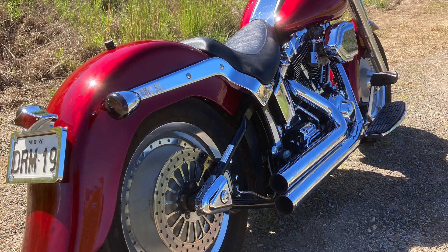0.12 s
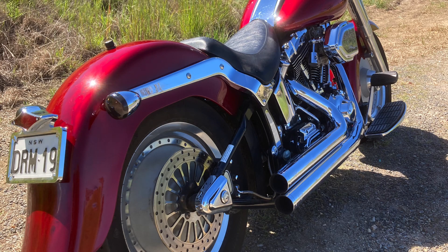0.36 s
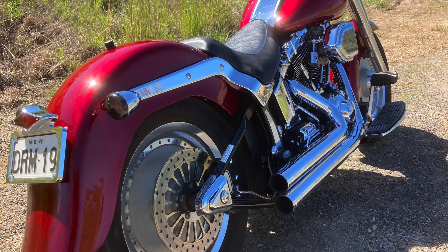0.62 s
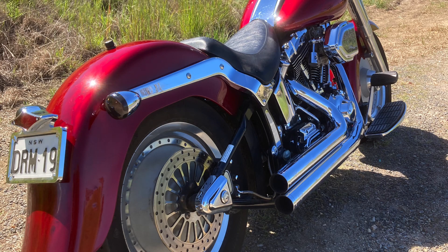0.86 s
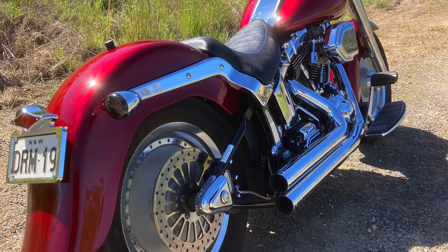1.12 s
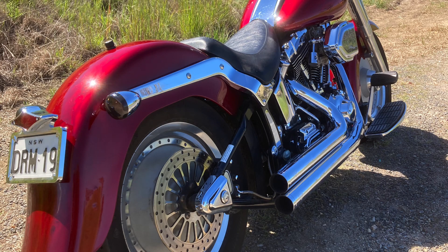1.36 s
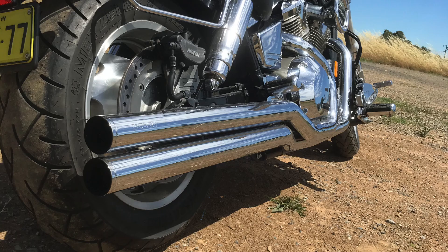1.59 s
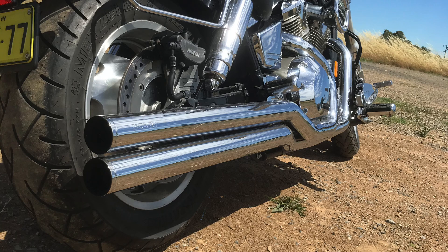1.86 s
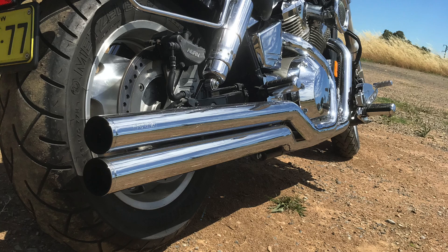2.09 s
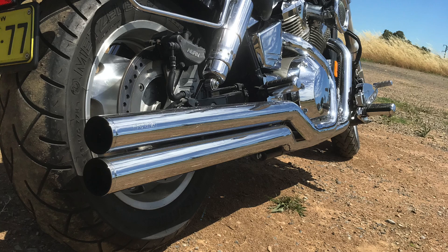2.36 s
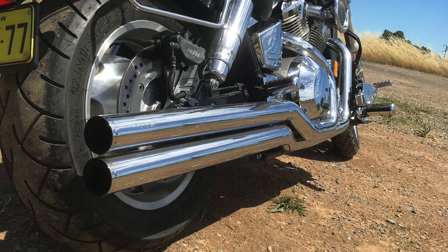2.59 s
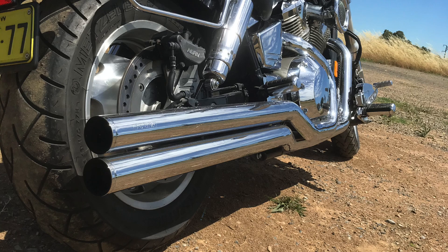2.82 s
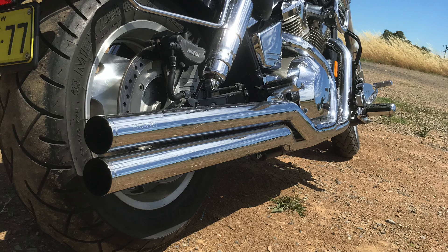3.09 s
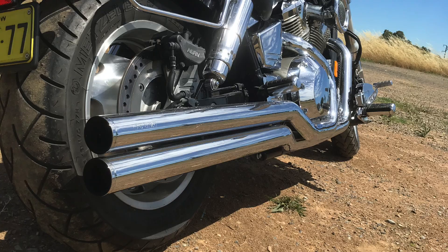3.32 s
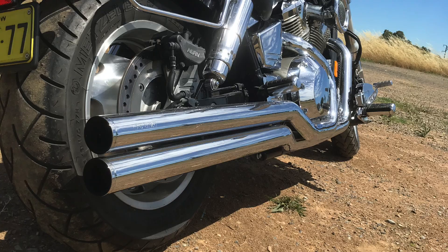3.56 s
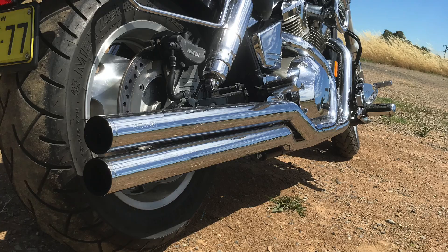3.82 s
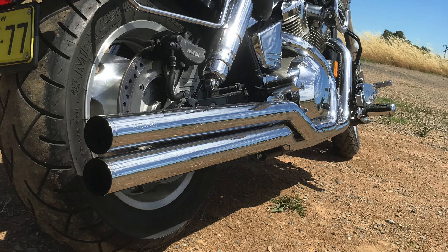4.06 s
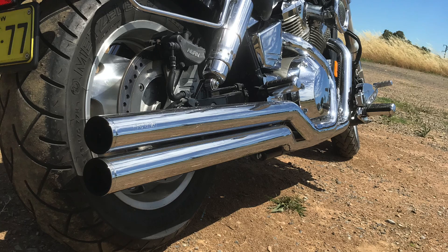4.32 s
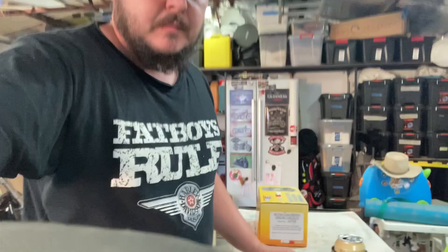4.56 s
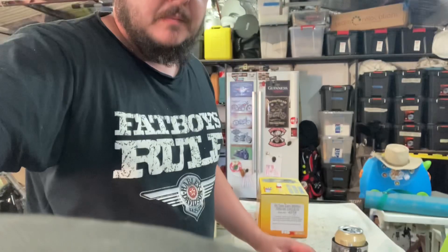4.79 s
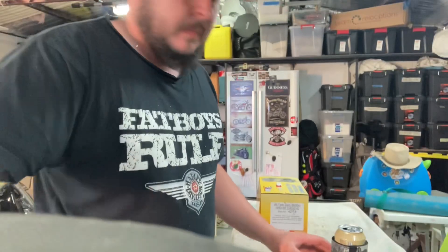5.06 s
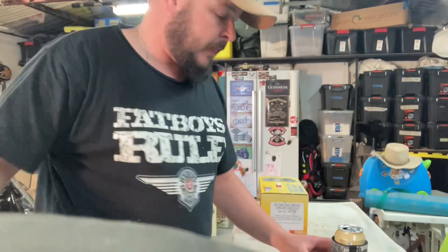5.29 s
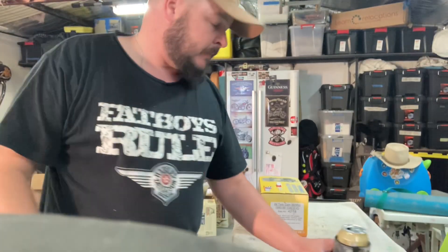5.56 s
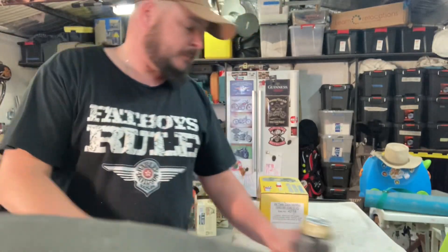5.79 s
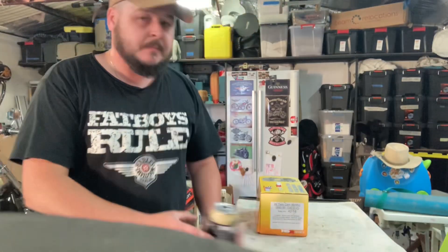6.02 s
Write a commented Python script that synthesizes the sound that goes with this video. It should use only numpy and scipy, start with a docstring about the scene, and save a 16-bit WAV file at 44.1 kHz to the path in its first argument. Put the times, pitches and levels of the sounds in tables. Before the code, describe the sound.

Close behind a big V-twin motorcycle outdoors, two open exhaust pipes pound out a loud, lopsided idle of deep thumps and dry cracks, with weak misfires between strong beats, mechanical clatter and a faint whistle. At about 4.5 seconds it cuts instantly to a quiet garage: soft fridge hum, cloth rustling, a drink can tapped and slid on a table.

```python
"""A big V-twin idles unevenly through two open pipes, heard from close by outdoors; some strokes misfire.
Each exhaust stroke is a tone swept along the gas column's pitch path: it thumps, swings and leaves the pipe ringing.
Noise bursts make the hot gas crack at the pipe mouth and the valves tick, over clatter, rumble and a whistle.
The scene then cuts to a quiet garage: a fridge hums as a fluttering sine, cloth rustles as grainy filtered noise,
and a drink can is tapped, ringing as tuned resonators, and slid on a table."""
import sys
import numpy as np
from scipy import signal
from scipy.fft import rfft, irfft
from scipy.io import wavfile

SR = 44100
rng = np.random.default_rng(int(sys.argv[2]) if len(sys.argv) > 2 else 0)


def waveform_to_disk(signal):
    """Save audio, clipped to [-1, 1], as 16-bit WAV at the path in sys.argv[1]."""
    frames = np.transpose(np.atleast_2d(signal))
    scaled = np.clip(frames, -1, 1) * 32767
    samples = np.round(scaled).astype(np.int16)
    wavfile.write(sys.argv[1], SR, samples)


def natural_amplitude(level_db):
    """Convert a level in decibels to a linear amplitude factor, elementwise."""
    exponent = np.asarray(level_db, float) / 20
    return 10 ** exponent


N = 271656

# exhaust strokes, the cylinders taking turns; levels are relative:
# [start_s, blowdown_db, swing_db, pipe_ring_db]
STROKES = [(-.011, 3, -7.5, -36), (0.065, -14, -5, -8.5), (.138, -3, -7, -0.5), (0.1949, -2, -1.5, -1),
           (.276, -11.5, -6.5, -11.5), (0.3339, -21, -8, -27), (0.4026, -3.5, -6, -2),
           (0.4626, -3.5, 0, -0.5), (.536, -6, -4.5, -2.5), (0.5944, -29, -7.5, -29),
           (0.6772, -5.5, -5.5, -7.5), (.734, -1, -3, -1.5), (0.8044, -22, -9.5, -26),
           (0.8671, -13, -6, -28), (0.9505, -5, -5.5, -3), (1.0088, -6, -5, -7), (1.087, -2, -5.5, -5),
           (1.1547, -18, -7.5, -11), (1.2204, -5.5, -4.5, -18.5), (1.278, -11.5, -8, -6),
           (1.3557, -3, -6.5, -0.5), (1.4168, -3.5, -3.5, -2), (1.4893, -7, -6, -28), (1.5551, -32, -8, -8),
           (1.6394, -4.5, -8, -4.5), (1.697, -5.5, -1.5, .5), (1.7673, -21, -11.5, -1.5),
           (1.852, -40, -5.5, -6.5), (1.928, -4, -7.5, -2.5), (1.986, -11.5, -4, -20),
           (2.0647, -15, -5.5, -20), (2.129, -7, -2.5, -12), (2.2072, -3, -4.5, -8),
           (2.2593, -12, -7, -10.5), (2.338, -18, -11.5, -10), (2.408, -5.5, -3.2, -2),
           (2.4872, 1, -6, -33), (2.5393, -3, -12.5, -5), (2.6131, -19, -14.5, -10),
           (2.6853, -8, -3.5, -13.5), (2.7666, -1, -5.5, -14.5), (2.8198, -11.5, -9, -8.5),
           (2.9043, -5.5, -5.5, -3), (2.9611, -19, -10.5, -4.5), (3.046, -4, -4.5, 2.5),
           (3.106, -3.5, -4.5, 1), (3.1729, -9, -9, -3.5), (3.2535, -33.5, -4.5, -5.5),
           (3.329, -5.5, -6.5, -9.5), (3.3929, -1, -1, -3), (3.4649, -0.3, -2, -4.5), (3.516, -16, -8, -6),
           (3.5919, -12, -10, -3.5), (3.6591, -5, -2.5, -15.5), (3.7389, -4, -4.5, -7),
           (3.801, -14, -8.5, -8), (3.891, -22.5, -11, -36.5), (3.9469, -6.5, -2, -3),
           (4.027, -1.5, -3, -14), (4.088, -16, -8.5, -7), (4.1653, -6.5, -7, -4.5),
           (4.2227, -22, -3.5, -4), (4.3059, -9.5, -7.5, -7), (4.371, -3.5, -.5, -3),
           (4.444, -1.4, -1.5, -7.5), (4.492, -18.5, -8.5, -12)]
# gas bursts at the pipe mouth, one a stroke, misfires weak; levels are relative:
# [start_s, level_db, treble_share_db]
CRACKS = [(0.058, -35.5, 7.5), (0.1362, -10, -3), (0.1929, -9, 5), (0.2827, -46, -12), (.328, -31, 1),
          (0.401, -20.5, 10.5), (0.4604, -13, 9), (0.5346, -22, 1.5), (.6, -29.5, 3), (.676, -24, 8),
          (0.7328, -7.5, 2), (0.821, -52, -7), (0.872, -59, -8), (0.9493, -9.5, 2.5), (1.0085, -13, 0),
          (1.0841, -13.5, 4), (1.1476, -32, 4), (1.2199, -28, 8), (1.2853, -51.5, -8.5), (1.3556, -13, -1),
          (1.4156, -8.5, -3), (1.492, -33, -10.5), (1.5574, -34, 3), (1.638, -25.5, 4), (1.698, -9.5, 3),
          (1.777, -33.5, 4.5), (1.841, -37, 1.5), (1.9249, -6.5, -2), (1.9855, -13.5, 3), (2.071, -41, 4),
          (2.1274, -12, -4), (2.206, -9, -2), (2.2678, -33.5, 4), (2.352, -40, 2), (2.4089, -9.5, 0.5),
          (2.4868, -12, 8), (2.549, -37.5, 12.5), (2.627, -40.5, 2), (2.684, -10, 2.5), (2.764, -12.5, 4),
          (2.8296, -35, 3.5), (2.9039, -20, 5.5), (2.9699, -47.5, -3), (3.046, -14, -2),
          (3.1029, -7.5, -0.5), (3.183, -38, 9), (3.2459, -31.5, 3), (3.3289, -7, -2), (3.3915, -9, 4.5),
          (3.4631, -9, -1), (3.5224, -34.5, 8), (3.5977, -33.5, 1.5), (3.6579, -6.5, 2),
          (3.7385, -10.5, 1.5), (3.8006, -39.5, 12.5), (3.883, -35.5, 3), (3.9463, -7, 5),
          (4.0267, -11.5, 5), (4.0914, -39.5, 10.5), (4.1615, -26.5, 1.5), (4.227, -49, -7),
          (4.3063, -25, 4), (4.369, -9, 0.5), (4.4422, -10.5, -2.5), (4.505, -34.5, 6.5)]


def exhaust():
    """Each stroke swings the gas column along its pitch path; a squeak climbs as the piston closes the gap."""
    # gas column through one stroke of usual length, in the lower pipe:
    # [time_ms after the valve opens, pitch_hz, relative level_db]
    column = [(-4.0, 30.0, -10.2), (2.0, 117.1, -0.4), (8.0, 74.7, -2.4), (14.0, 19.9, -5.1),
              (20.0, 65.6, -8.0), (28.0, 55.3, -5.4), (34.0, 83.7, -2.1), (40.0, 91.8, -2.3),
              (46.0, 59.6, -9.3), (55.0, 92.7, -7.7), (75.0, 85.9, -11.3), (110.0, 90.0, -38.7)]
    higher_pipe_ratio = 1.03
    out = np.zeros(N)
    knots_ms, pitch_hz, level_db = np.transpose(column)
    chance = rng.standard_normal((len(STROKES), 2))
    for k, ((s, blow_db, swing_db, ring_db), length) in enumerate(zip(STROKES, stroke_lengths())):
        ms = np.arange(-6 * length, 124 * length, 1000 / SR) / length   # a long stroke runs slower
        pipe_ratio = 1 if k % 2 == 0 else higher_pipe_ratio
        turns = np.cumsum(np.interp(ms, knots_ms, pitch_hz)) / (SR * length) * pipe_ratio
        turns -= np.interp(0, ms, turns)   # phase zero as the valve opens
        edges = np.interp(ms, [-6, -3, 110, 124], [0, 1, 1, 0])
        # blowdown hands over to the swing, the swing to the pipe ring
        parts = np.interp(ms, [12, 20, 42, 50], natural_amplitude(np.array([blow_db, swing_db, swing_db, ring_db])))
        thump = -np.sin(2 * np.pi * turns) * natural_amplitude(np.interp(ms, knots_ms, level_db)) * edges * parts

        # the shutting valve breaks the swing off where the ring is much weaker
        broken = np.clip((swing_db - ring_db) / 14 - .15, 0, 1)
        # the shrinking cylinder raises its cavity note until the valve shuts
        climb = np.cumsum(np.interp(ms, [38, 43, 51], [95, 190, 340])) / SR
        squeak = -np.sin(2 * np.pi * (climb - np.interp(41, ms, climb)))
        squeak *= hump(ms - 39, 1.8, 12) * np.interp(ms, [45, 53], [1, 0])
        squeak *= natural_amplitude(swing_db - 12.5 + 7 * broken + 2.5 * chance[k, 0])

        # steep front as the valve cracks open
        thump += natural_amplitude(blow_db - 11.5) * np.exp(-((ms + 1.13) / 0.72) ** 2)

        # a broken swing restarts as a free ring of the closed pipe, out of step
        restart = np.sin(2 * np.pi * (88 * (ms - 52) / 1000 + 0.31 * chance[k, 0]))
        restart *= hump(ms - 48, 5.3, 38) * edges
        thump += squeak + broken * natural_amplitude(swing_db - 5.5 + 1.5 * chance[k, 1]) * restart
        add(out, s - .006 * length, thump)
    return out


def stroke_lengths():
    """Length of each stroke against the usual, from the crank speed that the valve times show."""
    usual_gaps_s = (.081, .0585)   # wait from each cylinder's valve to the other's
    stretch_share = 0.66   # a slowing crank draws the stroke out
    gaps = np.diff(valves())
    ratio = gaps / np.resize(usual_gaps_s, len(gaps))
    return np.concatenate([[1], 1 + stretch_share * (ratio - 1), [1]])


def valves():
    """Times at which the exhaust valves lift, each a little ahead of its gas burst."""
    fired_db = -30   # a weaker burst is a misfire
    lead_fired_s, lead_misfire_s = 0.015, .0215
    s, level_db, treble_db = np.transpose(CRACKS)
    return s - np.where(level_db > fired_db, lead_fired_s, lead_misfire_s)


def bursts():
    """Cracks, and the ticks of each valve lifting and seating, in order of time."""
    valve_open_s = 0.0613
    # ticks: relative level dB, treble share dB, spread dB
    opening, seating = (-35.5, -11.5, 2.9), (-37.5, -19.5, 4.1)
    rows = list(CRACKS)
    chance = rng.standard_normal((len(CRACKS), 4))
    for s, luck in zip(valves(), chance):
        ticks = [(s, opening, luck[:2]), (s + valve_open_s, seating, luck[2:])]
        for at, (level_db, treble_db, spread_db), (a, b) in ticks:
            rows.append((at, level_db + spread_db * a, treble_db + 2 * spread_db * b))
    return sorted(rows)


def jets():
    """Noise bursts: strong ones crack sharply and leave a duller tail, weak ones puff slowly; resonances vary."""
    # spectrum of the escaping gas: [pitch_hz, relative density_db]
    jet = [(290, -38.5), (500, -12.5), (649, -8), (1000, -20.5), (1360, -9), (1930, -4.5), (2260, -7.5),
           (2930, -15), (3590, -9), (4870, -28.5), (5880, -24.5), (7000, -18.5), (8830, -18.5),
           (14900, -29.5), (16000, -42)]
    # pipe-mouth and heat-shield resonances lit by each burst: [pitch_hz, width_hz, relative level_db]
    mouth = [(656, 140, -1), (1463, 100, -9.5), (1766, 100, 0.5), (2074, 144, 0), (3374, 190, -1.5),
             (4280, 208, -5.5), (5840, 600, -11.5), (7460, 170, -17), (8640, 1320, -6.5), (9880, 660, -14)]
    split_hz = 5200
    rows = bursts()
    ms = np.arange(0, 60, 1000 / SR)
    at = np.array(rows)[:, 0]
    dull, bright = np.zeros(N), np.zeros(N)   # envelopes below and above the split
    for s, level_db, treble_db in rows:
        sharp = np.clip((level_db + treble_db / 2 + 29) / 12, 0, 1)
        head = hump(ms, 3.0 - 0.75 * sharp, 6.5 - 3.82 * sharp)
        dull_tail = natural_amplitude(-12.5) * hump(ms, 2.4, 7.9)
        bright_tail = natural_amplitude(-24.5) * hump(ms, 2.3, 3.2)
        add(dull, s - .0012, natural_amplitude(level_db - 3.5) * (head + dull_tail))
        add(bright, s - .0009, natural_amplitude(level_db - 3.0 + treble_db) * (head + bright_tail))
    gas = coloured(jet)
    low = signal.sosfilt(signal.butter(2, split_hz, fs=SR, output="sos"), gas)
    out = natural_amplitude(-2) * (dull * low + bright * (gas - low))

    # every burst lights each resonance by a level of its own
    latest = np.clip(np.searchsorted(at - .002, np.arange(N) / SR) - 1, 0, None)
    chance = rng.standard_normal((len(at), len(mouth)))
    white = rng.standard_normal(N)
    for k, (hz, width_hz, level_db) in enumerate(mouth):
        drive = white * (dull if hz < split_hz else bright) * natural_amplitude(5.66 * chance[latest, k])
        out += natural_amplitude(level_db + 8.0) * band(drive, hz - width_hz / 2, hz + width_hz / 2, order=1)
    return out


def mechanics():
    """Clatter, rumble and a low-mid band: filtered noises, all but the rumble throbbing with the strokes."""
    # spectrum of the engine's clatter: [pitch_hz, relative density_db]
    clatter_colour = [(180, -46.5), (300, -2), (418, -8), (1030, -16), (1510, -14.5), (1870, -24),
                      (2280, -22), (2520, -29), (3520, -30), (5430, -36), (8500, -37), (12100, -54.5),
                      (16000, -51.5)]
    clatter_db, rumble_db, low_mid_db = -48.5, -29, -39.5
    throb = np.zeros(N)
    ms = np.arange(0, 70, 1000 / SR)
    for s, blow_db, *rest in STROKES:
        add(throb, s, natural_amplitude(blow_db + 13.5) * hump(ms, 1.0, 20.4))
    clatter = natural_amplitude(clatter_db + 2.96 * drift(60)) * coloured(clatter_colour) * (1.54 + throb)
    rumble = natural_amplitude(rumble_db + 4 * drift(30)) * rms_one(band(rng.standard_normal(N), 65, 141.6))
    # a band of low-mid noise throbs with the strokes
    low_mid = rms_one(band(rng.standard_normal(N), 190, 317)) * (0.72 + 1.3 * throb)
    low_mid *= natural_amplitude(low_mid_db + 3 * drift(40))
    return clatter + rumble + low_mid


def intake_whistle():
    """The intake whistles as each valve lifts: a wavering sine that swells there over a faint steady rest."""
    whistle_db, whistle_hz = -45, 2287
    swell = np.zeros(N)
    ms = np.arange(0, 70, 1000 / SR)
    for s, luck in zip(valves(), rng.standard_normal(len(CRACKS))):
        add(swell, s - .003, natural_amplitude(4.5 * luck) * hump(ms, 13, 9.2))
    tone = np.sin(2 * np.pi * np.cumsum(whistle_hz + 28 * drift(90)) / SR) * natural_amplitude(3 * drift(120))
    return natural_amplitude(whistle_db) * tone * (0.13 + 4.5 * swell)


def can_taps():
    """Clicks strike two-pole resonators, the can's ringing modes, each hit at a slightly different level."""
    # can tapped on the table: [start_s, relative level_db]
    taps = [(5.2695, -36.5), (5.287, -31.5), (5.3921, -42.5), (5.9644, -38), (6.0324, -42.5),
            (6.1142, -29.5)]
    # ringing modes of the can: [pitch_hz, relative level_db, decay_t60_s]
    modes = [(1340, -15.5, 0.038), (1600, -9, 0.031), (1813, 2.5, 0.044), (2190, -3.5, 0.034),
             (2880, -13, .02), (4340, -20, .015)]
    out = np.zeros(N)
    at = [round(s * SR) for s, level_db in taps]
    for hz, level_db, t60_s in modes:
        clicks = np.full(N, 1e-18)
        clicks[at] = natural_amplitude(np.array(taps)[:, 1] + level_db - 8 + rng.normal(0, 2.5, len(at)))
        radius = natural_amplitude(-60 / (t60_s * SR))
        angle = 2 * np.pi * hz / SR
        poles = [1, -2 * radius * np.cos(angle), radius * radius]
        out += signal.lfilter([0, np.sin(angle)], poles, clicks)
    return out


def rustles():
    """Cloth, hands and the sliding can: noise in four ranges, roughened by random grains."""
    # overall colour of the rustling as it is heard, with a narrow hole near 11.5 kHz:
    # [pitch_hz, relative density_db]
    slide = [(300, 8.5), (700, 0.5), (1000, 0), (1300, 2), (1600, -4.5), (2250, -1), (3250, -5.5),
             (4400, -4), (6000, -14), (9000, -8), (10600, -13), (11500, -40), (12600, -11), (14800, -16),
             (16000, -44)]
    grains_per_s, grain_share = 1500, 0.45
    ranges_hz = [(350, 900), (800, 1550), (1500, 7200), (5200, 21000)]
    out = np.zeros(N)
    for gain, edges_hz in zip(rustle_levels(), ranges_hz):
        grains = (rng.random(N) < grains_per_s / SR) * rng.exponential(1, N)
        grit = rms_one(signal.lfilter([1], [1, -.97], grains))
        cloth = coloured(slide) * natural_amplitude(2.1 * drift(120)) * (1 + grain_share * grit)
        out += gain * natural_amplitude(0.42 * drift(50)) * rms_one(band(cloth, *edges_hz, order=3))
    return out


def rustle_levels():
    """Gain in time of the dull, middle, bright and top ranges: a quick rise, then a steady fall in dB."""
    # cloth and hands moving, the can sliding; the fall begins length_s after the start:
    # [start_s, length_s, bright_db, middle_share_db, dull_share_db]
    moves = [(4.525, 0.016, -60.5, 3.5, -10), (4.57, 0.095, -88.5, 22, 6), (4.662, 0.018, -82, 4, 10),
             (4.805, 0.018, -82, 3.5, 10), (4.72, 0.062, -68, -4, -6), (5.232, .015, -61.5, -13, -18),
             (5.252, 0.033, -53.5, -8, -25), (5.371, 0.19, -60.5, -20, -7.5), (5.446, 0.023, -74, -8, 14.5),
             (5.49, 0.028, -73, -15, 15), (5.613, 0.097, -55, -13.5, -4.5), (5.88, .14, -48, -4.5, -13),
             (6.093, 0.067, -52, -4.5, -24)]
    rise_s, fall_db_per_s, top_share_db = .014, 170, -5
    t = np.arange(N) / SR
    out = np.zeros((4, N))
    for s, length_s, bright_db, middle_db, dull_db in moves:
        rise = np.clip((t - s) / rise_s, 0, 1) ** 2
        shape = rise * natural_amplitude(bright_db - fall_db_per_s * np.maximum(t - s - length_s, 0))
        out += natural_amplitude(np.array([[dull_db], [middle_db], [0], [top_share_db]])) * shape
    return out


def fridge():
    """The fridge hums: one sine, its level fluttering quickly and its phase wavering."""
    hum_hz, hum_db = 292, -59
    phase = 2 * np.pi * hum_hz * np.arange(N) / SR + .35 * drift(14)
    return np.sqrt(2) * natural_amplitude(hum_db + 1.3 * drift(40)) * np.sin(phase)


def sagging_tone():
    """A faint sine sags in pitch, fast at first, under a rounded envelope."""
    start_s, length_s, from_hz, to_hz, level_db = 5.54, 0.27, 395, 335, -63
    part = np.clip((np.arange(N) / SR - start_s) / length_s, 0, 1)
    tone = np.sin(2 * np.pi * np.cumsum(from_hz + (to_hz - from_hz) * part ** .5) / SR)
    return natural_amplitude(level_db + 3 * drift(30)) * np.sin(np.pi * part) ** .5 * tone


def room_noise():
    """Low noise swells into dull bumps over a faint, wide hiss."""
    # dull bumps: [start_s, relative level_db]
    bumps = [(4.548, -40), (4.592, -50), (4.685, -46.5), (5.41, -60), (5.51, -48), (5.9, -59), (6.13, -64)]
    low_db, hiss_db = -65.5, -81.5
    level = np.full(N, natural_amplitude(low_db))
    for s, level_db in bumps:
        add(level, s, natural_amplitude(level_db + 0.5) * hump(np.arange(0, 200, 1000 / SR), 13, 23))
    low = level * rms_one(band(rng.standard_normal(N), 28, 300))
    hiss = natural_amplitude(hiss_db) * rms_one(band(rng.standard_normal(N), 300, 10000, order=1))
    return low + hiss


def rms_one(x):
    """Scale to unit power."""
    return x / np.sqrt(np.mean(x ** 2) + 1e-20)


def band(x, low_hz, high_hz, order=2):
    """Butterworth band-pass."""
    return signal.sosfilt(signal.butter(order, [low_hz, high_hz], "band", fs=SR, output="sos"), x)


def coloured(spectrum):
    """White noise shaped to a spectrum; rms 1."""
    hz, db = np.transpose(spectrum)
    grid = np.maximum(np.fft.rfftfreq(N, 1 / SR), 1)
    shape = natural_amplitude(np.interp(np.log(grid), np.log(hz), db, left=-90, right=-90))
    return rms_one(irfft(rfft(rng.standard_normal(N)) * shape, N))


def drift(rate):
    """Random wander: straight lines between normal draws, rate of them a second."""
    knots = rng.standard_normal(int(N / SR * rate) + 2)
    return np.interp(np.arange(N) / SR * rate, np.arange(len(knots)), knots)


def add(out, s, piece):
    """Mix a piece in from time s on."""
    start = round(s * SR)
    piece = piece[max(-start, 0):N - start]
    out[max(start, 0):max(start, 0) + len(piece)] += piece


def hump(ms, rise_ms, fall_ms):
    """Envelope with a quick rise and an exponential fall."""
    ms = np.maximum(ms, 0)
    return (1 - np.exp(-(ms / rise_ms) ** 2)) * np.exp(-ms / fall_ms)


def scene():
    """The engine up to the cut, the garage after it; each microphone loses the deepest bass."""
    cut_s, fade_s, mic_cut_hz = 4.527, .005, 21   # the short fade ends at the cut
    outdoors = np.clip((cut_s - np.arange(N) / SR) / fade_s, 0, 1)
    engine = exhaust() + jets() + mechanics() + intake_whistle()
    garage = can_taps() + rustles() + fridge() + sagging_tone() + room_noise()
    bass_cut = signal.butter(2, mic_cut_hz, "high", fs=SR, output="sos")
    engine, garage = signal.sosfilt(bass_cut, np.array([engine, garage]))
    return (engine * outdoors + garage * (1 - outdoors))[None]


def roll_off(x):
    """The treble ends steeply here."""
    return signal.sosfilt(signal.butter(12, 16460, fs=SR, output="sos"), x)


def record(dry):
    """Peaks stop at full scale."""
    mix = np.clip(dry, -1, 1)
    return roll_off(mix)


dry = scene()
out = record(dry)
waveform_to_disk(out)
```